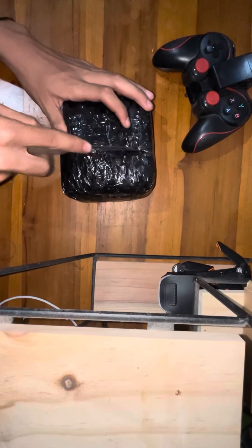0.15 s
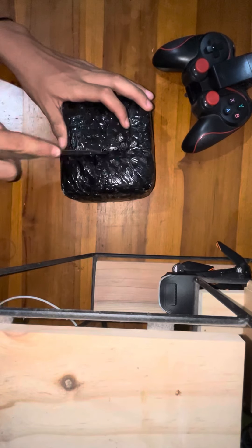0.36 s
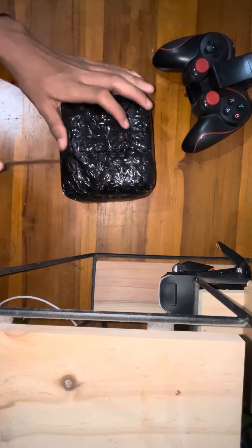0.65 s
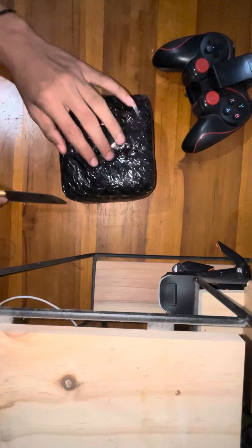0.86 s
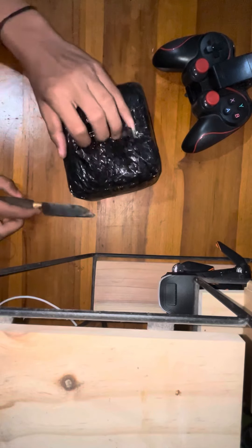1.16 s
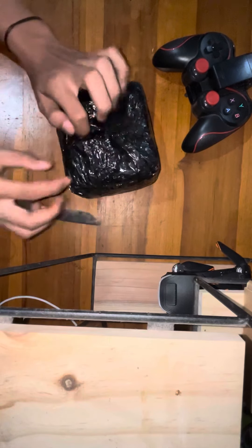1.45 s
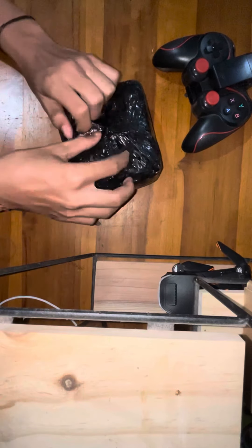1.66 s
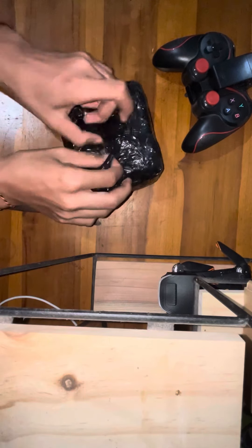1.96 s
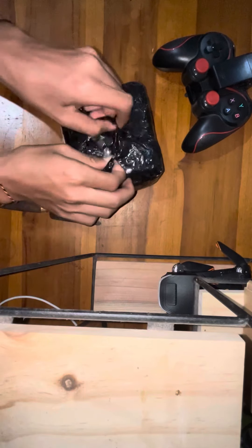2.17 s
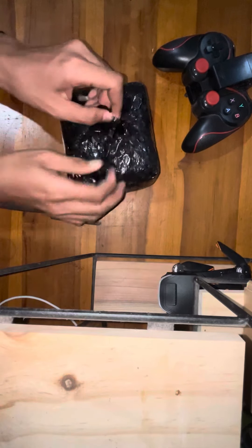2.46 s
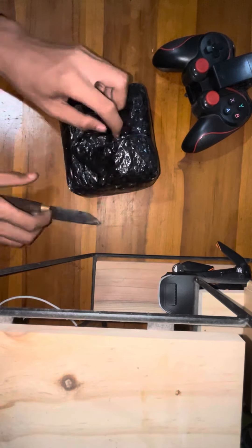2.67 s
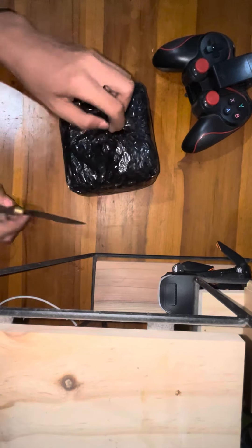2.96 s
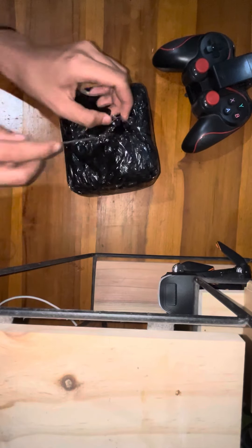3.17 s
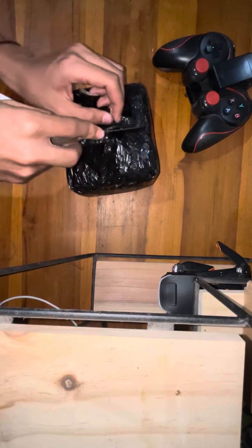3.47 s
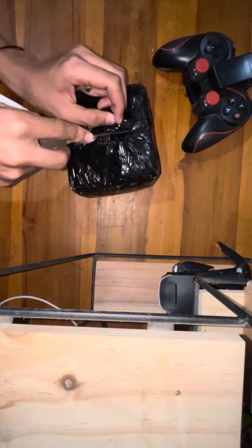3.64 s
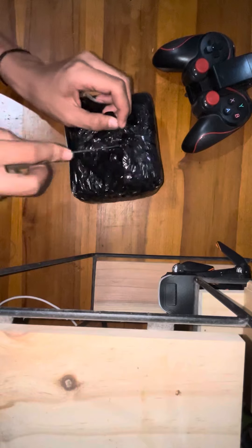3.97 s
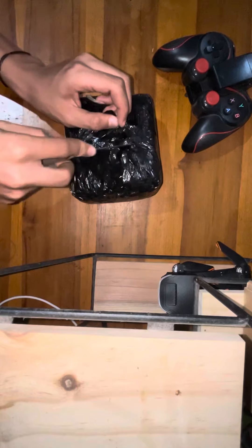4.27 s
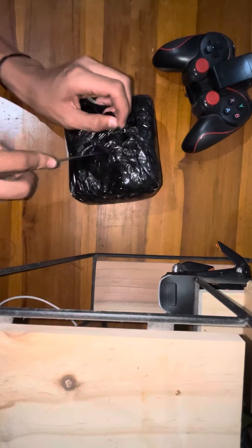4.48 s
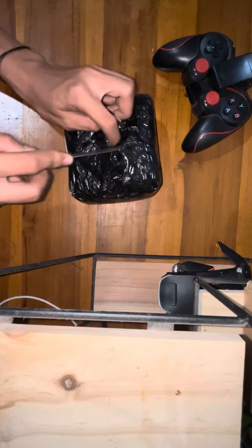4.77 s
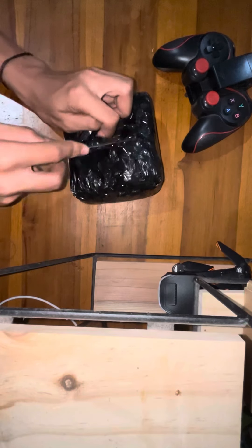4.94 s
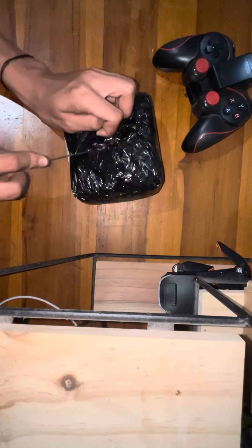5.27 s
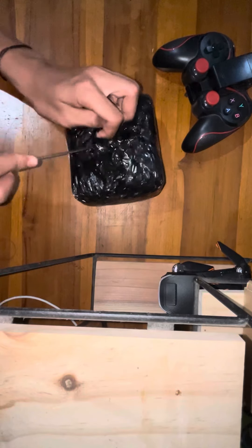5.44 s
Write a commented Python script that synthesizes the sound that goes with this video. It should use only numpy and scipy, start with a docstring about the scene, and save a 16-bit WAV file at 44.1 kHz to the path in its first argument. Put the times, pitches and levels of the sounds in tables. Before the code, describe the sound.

Close to the microphone, the plastic wrap of a small parcel crinkles in uneven bursts as it is slit and pulled. A knife clacks down on the wooden table, fingers tap and tug the film with sharp snaps, and the knife clacks again. A louder run of cracks and a brief blade rasp follow, then more crackling. The parcel scrapes and softly thumps the table in a room with little echo.

```python
"""A wooden table in a room, a phone's two microphone ports above it. The plastic wrap of a small parcel is slit
with a knife and tugged open: the film rustles in dense tiny creases and snaps in louder ones. The parcel
scrapes and shoves the table, whose board knocks and whose frame booms near 64 Hz. The knife clacks on the wood,
fingers tap the parcel and the board, the blade rasps in the slit. The two ports hear the treble with a lag
between them."""
import sys
import numpy as np
from scipy import signal
from scipy.fft import rfft, irfft, next_fast_len
from scipy.io import wavfile
from scipy.ndimage import map_coordinates

SR = 44100
rng = np.random.default_rng(int(sys.argv[2]) if len(sys.argv) > 2 else 0)


def waveform_to_disk(signal):
    """Save audio, clipped to [-1, 1], as 16-bit WAV at the path in sys.argv[1]."""
    frames = np.transpose(np.atleast_2d(signal))
    scaled = np.clip(frames, -1, 1) * 32767
    samples = np.round(scaled).astype(np.int16)
    wavfile.write(sys.argv[1], SR, samples)


N = 247401

# Steady working of the film. Each row: time in seconds, crease level in dB, scrape level in dB.
HANDLING = [(0.05, -73.5, -76), (0.066, -55.5, -60.5), (0.28, -47, -48.5), (0.49, -46.5, -49),
            (0.83, -57, -62), (0.88, -52, -55.5), (1.1, -48, -50.5), (1.4, -50.5, -55.5),
            (1.52, -60, -58.5), (1.75, -45, -49.5), (2.2, -47, -51.5), (2.72, -53.5, -60),
            (3.1, -50.5, -56.5), (3.19, -55, -70.5), (3.39, -65, -71), (3.412, -52, -58.5),
            (3.68, -48.5, -62), (4.115, -65.5, -62), (4.19, -51.5, -59.5), (4.57, -50.5, -48.5),
            (4.64, -56, -58), (4.8, -53.5, -61.5), (5.07, -52, -52.5), (5.35, -53.5, -47.5),
            (5.61, -53.5, -75)]


def amp(db):
    """Gain of a level in dB."""
    return 10 ** (np.asarray(db) / 20)


def unit(x):
    """x at rms 1."""
    return x / np.sqrt(np.mean(x ** 2) + 1e-20)


def along(points, hz):
    """Interpolate (Hz, value) points on a log axis."""
    f, v = np.transpose(points)
    return np.interp(np.log(hz + 1), np.log(f + 1), v)


def curves(rows):
    """One value per sample for each column after the time."""
    s, *cols = np.transpose(rows)
    return [np.interp(np.arange(N) / SR, s, c) for c in cols]


def filtered(x, response):
    """x through a complex response of frequency."""
    m = next_fast_len(N + SR // 2)
    return irfft(rfft(x, m) * response(np.fft.rfftfreq(m, 1 / SR)), m)[..., :N]


def modes(rows):
    """Causal response of broad resonances, given as (centre Hz, width Hz, gain dB)."""
    return lambda f: sum((-1) ** k * amp(db) * 1j * f * width / (hz * hz - f * f + 1j * f * width)
                         for k, (hz, width, db) in enumerate(rows))


def wobble(rate):
    """A smooth random curve, rate knots a second."""
    return map_coordinates(rng.standard_normal(int(N * rate / SR) + 4), [np.arange(N) * rate / SR])


def grains(rate, spread_db, clump_db, t60, smooth):
    """Two noises gated alike by short random bursts, a few much louder, in clumps over a smooth part."""
    starts = (rng.random(N) < rate / SR) * amp(spread_db * np.minimum(rng.exponential(size=N), 4))
    gate = signal.lfilter([1], [1, -amp(-60 / (t60 * SR))], starts)
    return unit((unit(gate) + smooth) * amp(clump_db * wobble(30)) * rng.standard_normal((2, N)))


def swells(peaks_s, levels_db, rise_db_per_s, fade_db_per_s):
    """Gain of bursts that swell to their peak and fade away, summed as power."""
    late = np.arange(N) / SR - np.reshape(peaks_s, (-1, 1))
    drop_db = np.where(late < 0, np.reshape(rise_db_per_s, (-1, 1)), -fade_db_per_s) * late
    return np.sqrt(np.sum(amp(np.reshape(levels_db, (-1, 1)) + drop_db) ** 2, axis=0))


def hand_effort():
    """Gains of creases and scrape: steady working plus tugs and cuts."""
    # Each row: peak in seconds, crease in dB, scrape in dB, seconds to swell 20 dB (sign ignored).
    tugs = [(0.536, -45, -41.5, 0.2), (1.19, -55, -60, 0.1), (1.294, -70, -43.5, 0.12),
            (1.596, -40, -44.5, 0.05), (1.967, -50, -41, 0), (2.069, -43.5, -53, 0),
            (2.477, -43, -43.5, -0.31), (2.794, -56, -44.5, 0.07), (3.713, -53, -45.5, 0.3),
            (3.817, -36.5, -36.5, 0.0843), (4.252, -50, -39, 0.0145), (4.313, -39.5, -39, 0.08),
            (4.521, -46, -45, 0.24), (4.85, -45, -46, 0.07), (5.256, -40, -40.5, 0.17),
            (5.479, -47, -45, 0.07)]
    s, crease_db, scrape_db, swell_s = np.transpose(tugs)
    tugging = [swells(s, db, 20 / np.abs(swell_s), fade_db_per_s=163) for db in (crease_db, scrape_db)]
    return np.hypot(amp(curves(HANDLING)), tugging)


def rustle():
    """Large and small creases flip all over the film; the parcel scrapes the wood with a duller grain."""
    # Spectra of film and scrape. Each row: frequency in Hz, relative level in dB.
    film_spectrum = [(400, -30), (1200, -8), (2500, -2), (5000, -1), (12500, 0), (16000, -7)]
    scrape_spectrum = [(200, -4), (450, -2.5), (950, -0.5), (1450, 3.5), (1900, 0.5), (2500, 4), (4800, 0),
                       (9000, -51)]
    creasing, scraping = hand_effort()
    large = grains(rate=460, spread_db=4.0, clump_db=2.3, t60=0.02, smooth=0.85)
    small = grains(rate=450, spread_db=5.5, clump_db=2.6, t60=0.006, smooth=0.9)
    share = lambda hz: 1 / (1 + (hz / 7000) ** 4)  # small creases take over in the treble
    creases = filtered(large, lambda hz: np.sqrt(share(hz)))
    creases += filtered(small, lambda hz: np.sqrt(1 - share(hz)))
    creases = unit(filtered(creases, lambda hz: amp(along(film_spectrum, hz))))
    scrape = grains(rate=430, spread_db=3.0, clump_db=2.2, t60=0.03, smooth=0.65)
    scrape = unit(filtered(scrape, lambda hz: amp(along(scrape_spectrum, hz))))
    return creasing * creases + scraping * scrape


def sharp_cracks():
    """Film folds snap, and the knife clacks on the wood at 1.28 and 2.78 s; each knocks the board."""
    # Each row: start in seconds, levels of crack, bright edge and knock in dB, crack pitch in Hz.
    strikes = [(0.061, -42, -38.5, -55, 2770), (0.268, -40, -38, -59, 2500), (0.348, -38, -38, -51, 3440),
               (0.399, -28.5, -38, -40, 1950), (0.515, -24.5, -29.5, -35, 1450),
               (0.529, -22.5, -25, -32, 1920), (0.675, -30.5, -53, -56, 1140),
               (0.687, -34.5, -39.5, -48, 1550), (0.735, -34.5, -33.5, -46, 2420),
               (0.8602, -39, -39, -52.5, 2230), (1.1843, -35.5, -41, -47, 1300),
               (1.283, -15, -41, -34.5, 1590), (1.8558, -31, -32, -48.5, 1480),
               (1.968, -29, -31, -30, 1490), (2.0365, -29, -44, -36.5, 1090),
               (2.1526, -42, -26.5, -66.5, 2650), (2.1631, -23, -32, -64, 2280),
               (2.2304, -30, -36.5, -48, 1320), (2.2989, -26.5, -31.5, -44.5, 1300),
               (2.3086, -29, -35, -67, 1690), (2.3121, -13, -23.5, -41.5, 1580),
               (2.461, -21.5, -32.5, -32.5, 1630), (2.601, -25, -32, -39.5, 1290),
               (2.7805, -25, -46, -33, 2670), (3.088, -42, -51.5, -48, 1500),
               (3.1347, -53, -33.5, -58.5, 2900), (3.368, -45, -55, -79, 1450),
               (3.407, -39, -49, -70, 1350), (3.6513, -27.5, -35, -48, 1460),
               (3.7044, -13, -22.5, -24.5, 2420), (3.7143, -19, -43, -38, 1390),
               (3.754, -15, -17.5, -27, 2210), (3.7607, -18.5, -24, -33.5, 1390),
               (3.807, -36, -19, -45, 2470), (3.8141, -26, -26, -45, 2820),
               (3.838, -36, -32.5, -43.5, 2900), (4.2409, -26.5, -29.5, -37.5, 1450),
               (4.255, -14.5, -36, -28, 1570), (4.2922, -24, -32, -43, 2600),
               (4.316, -17, -37, -29.5, 1570), (4.5098, -28.5, -37.5, -44.5, 2120),
               (4.533, -34, -34, -45, 3820), (5.0909, -34.5, -35.5, -48.5, 3250),
               (5.185, -31.5, -35, -48, 1490), (5.206, -34, -58, -48, 1210), (5.257, -32, -32, -35, 1430),
               (5.465, -29, -42, -55, 1180), (5.489, -35, -27.5, -49.5, 890)]
    # The board's knock resonances. Each row: centre in Hz, width in Hz, gain in dB.
    knock_modes = [(309, 190, 28), (429, 294, 25.5), (662, 248, 25.5), (852, 650, 21.5)]
    parts, t = np.zeros((3, 2, N + SR)), np.arange(SR // 8) / SR
    edge = amp(-60 * t / 0.0016) + 0.11 * amp(-60 * t / 0.03)
    crack = 0.86 * amp(-60 * t / 0.0058) + 0.055 * amp(-60 * t / 0.06)
    knock = 0.16 * amp(-60 * t / 0.15)
    shapes = np.array([edge, crack, knock])[:, None]
    grid_hz = np.fft.rfftfreq(len(t), 1 / SR)
    for s, crack_db, edge_db, knock_db, crack_hz in strikes:
        ragged = amp(5 * rng.standard_normal(len(t) // 60 + 1)).repeat(60)[:len(t)]
        bursts = shapes * rng.standard_normal((3, 2, len(t)))
        bursts *= (np.linalg.norm(shapes, axis=2) / np.linalg.norm(bursts, axis=2))[..., None]
        bursts[1] += 0.08 * amp(-60 * t / 0.035) * ragged * rng.standard_normal((2, len(t)))
        bursts[1:, 0, 0] += [3.2, 5]  # crack and knock start with one clean push
        overtone_hz = 1.87 * crack_hz
        body = modes([(crack_hz, 0.45 * crack_hz, 11.5), (overtone_hz, 0.45 * overtone_hz, 8)])
        bursts[1] = irfft(rfft(bursts[1]) * body(grid_hz), len(t))
        bursts *= amp([edge_db, crack_db, knock_db])[:, None, None]
        parts[:, :, round(s * SR):][:, :, :len(t)] += bursts
    edges, cracks, knocks = parts[:, :, :N]
    bright = filtered(edges, lambda hz: 5.24 * (1j * hz / (4200 + 1j * hz)) ** 2)
    struck = bright + cracks + filtered(knocks, modes(knock_modes))
    # low pitches arrive later: a delay of about one cycle plus 0.8 ms
    return filtered(struck, lambda hz: np.exp(-2j * np.pi * (np.log(hz + 20) + .0008 * hz)))


def table_shoves():
    """Shoves thump frame and top board and leave the board rattling; scraping keeps both stirring."""
    # Each row: time in seconds, frame boom in dB, top board in dB.
    shoves = [(0.541, -36.5, -49.5), (0.644, -45.5, -60), (0.901, -47, -61), (1.013, -44, -39),
              (1.179, -45, -42.5), (1.244, -34, -49), (1.29, -30.5, -37), (1.353, -44, -38.5),
              (1.788, -50, -53), (1.974, -35.5, -48), (2.134, -45.5, -58), (2.474, -41.5, -49.5),
              (2.77, -38, -34), (2.835, -41, -40.5), (2.904, -43, -58), (3.705, -48, -49),
              (3.762, -37, -46.5), (4.317, -45, -48.5), (4.853, -40, -58), (5.486, -49, -56)]
    # Resonances of frame and top board. Each row: centre in Hz, width in Hz, gain in dB.
    frame_modes = [(63.7, 21, 0)]
    top_modes = [(106.8, 31, 3.5), (194.6, 77, -5.5), (283, 217, -11.5)]
    s, boom_db, board_db = np.transpose(shoves)
    scraping = amp(curves(HANDLING)[1])
    sway = lambda hz: modes(frame_modes)(hz) ** 2
    flex = lambda hz: modes(top_modes)(hz) ** 2
    pushes, impulse = np.zeros((2, N)), np.arange(N) == 0
    pushes[:, np.round(s * SR).astype(int)] = amp([boom_db, board_db - 3.5]) * rng.choice([-1, 1], len(s))
    thumps = sum(filtered(push, body) / np.abs(filtered(impulse, body)).max()
                 for push, body in zip(pushes, (sway, flex)))
    stirring = np.hypot(amp(-7) * scraping, amp(-71))  # the building's faint tremor remains at rest
    rumble = stirring * unit(filtered(rng.standard_normal((2, N)), sway))
    chatter = grains(rate=80, spread_db=2, clump_db=1.5, t60=.06, smooth=.45)
    jolts = swells(s + 0.0083, board_db, rise_db_per_s=700, fade_db_per_s=170)
    rattle = np.hypot(jolts, amp(-12) * scraping) * unit(filtered(chatter, modes(top_modes)))
    return thumps * [[1], [0]] + rumble + rattle


def knife_touches():
    """Every touch on the table rings handle and blade, each mode at a new strength and phase."""
    # Each row: start in seconds, handle level in dB, blade level in dB.
    touches = [(1.008, -52, -41), (1.172, -48.5, -44), (1.283, -31, -34), (1.287, -40, -36.5),
               (1.29, -32, -42), (1.297, -32.5, -49), (1.506, -46.5, -50.5), (2.756, -40, -80),
               (2.765, -35, -69), (2.779, -40.5, -35.5), (2.795, -30.5, -66)]
    # Modes of handle and blade. Each row: pitch in Hz, level in dB, seconds to fade 60 dB.
    handle_modes = [(278, -12.5, 0.065), (471, -13.5, 0.31), (612, -7.5, 0.18), (713, -1, 0.049),
                    (904, -2.5, 0.08), (1085, -3.5, 0.059), (1333, -3, 0.066), (1632, -4, 0.054)]
    blade_modes = [(2355, -1, .06), (2620, -3, .06), (2900, -1, .05), (3400, -3, .07), (4350, -2, .05)]
    out, t = np.zeros((2, N + SR)), np.arange(SR // 5) / SR
    for s, handle_db, blade_db in touches:
        for ringing, db in ((handle_modes, handle_db), (blade_modes, blade_db)):
            for hz, mode_db, t60 in ringing:
                phase = 2 * np.pi * (hz * t + rng.random((2, 1)))
                blur = np.cumsum(rng.normal(0, .055, len(t)))  # a rattling grip blurs the pitch
                decay = amp(db + mode_db + rng.normal(0, 4.1) - 60 * t / t60)
                out[:, round(s * SR):][:, :len(t)] += decay * np.sin(phase + blur)
    return out[:, :N]


def finger_taps():
    """Each tap is one soft note, of the hollow parcel or of the table's board."""
    # Each row: start in seconds, level in dB, pitch in Hz.
    taps = [(1.011, -33.5, 640), (1.51, -39.5, 196), (1.56, -39.5, 260), (1.636, -39.5, 199),
            (2.492, -36, 420)]
    t60, rise_s = 0.055, 0.003
    out, t = np.zeros(N + SR), np.arange(SR // 4) / SR
    for s, db, hz in taps:
        envelope = amp(db - 60 * t / t60) * (1 - np.exp(-t / rise_s))
        out[round(s * SR):][:len(t)] += envelope * np.sin(2 * np.pi * hz * t)
    return out[:N] * [[1], [0]]


def blade_rasp():
    """Drawn out of the cut, the blade rubs along the slit and sounds the hollow under it."""
    # Each row: time in seconds, level in dB.
    stroke = [(3.84, -87), (3.89, -52.5), (4.05, -56), (4.08, -74)]
    rubbing = grains(rate=500, spread_db=2, clump_db=1.2, t60=0.02, smooth=1.5)
    return amp(curves(stroke)[0]) * unit(filtered(rubbing, lambda hz: modes([(1100, 900, 0)])(hz) ** 2))


def room_tail(x):
    """The room's short answer, dying fastest in the treble."""
    # Each row: frequency in Hz, seconds to fade 60 dB.
    decay_times = [(200, 0.38), (1500, 0.24), (5000, 0.19), (14000, 0.028)]
    hz, t, noise = signal.stft(rng.standard_normal((2, SR // 3)), SR, nperseg=256)
    tail = signal.istft(noise * amp(-60 * t / along(decay_times, hz)[:, None]), SR, nperseg=256)[1]
    delayed = np.pad(x, ((0, 0), (200, 0)))
    return signal.fftconvolve(delayed, tail / np.linalg.norm(tail[0]), axes=1)[:, :N]


def scene():
    """Both ports share row 0 of each source; row 1 is scattered and reaches them in opposite sense."""
    # Each row: frequency in Hz, likeness of left and right (1 is identical).
    likeness = [(60, .93), (300, .86), (800, .55), (1600, .7), (2600, .5), (4500, .4), (6000, .85),
                (15000, .9)]
    hits = sharp_cracks() + knife_touches() + finger_taps()
    pair = hits + amp(-15) * room_tail(hits) + rustle() + blade_rasp() + table_shoves()
    turn = lambda hz: np.arccos(np.clip(along(likeness, hz), -1, 1)) / 2
    shared, scattered = filtered(pair, lambda hz: np.array([np.cos(turn(hz)), np.sin(turn(hz))]))
    return np.array([shared + scattered, shared - scattered])


def record(dry):
    """The phone's ports differ in phase and level; deep bass rolls off and the top treble is cut."""
    # Each row: frequency in Hz, phase lead of the left port in radians.
    lead = [(0, 0), (300, -.4), (900, -1.3), (1550, 0), (2600, 2.4), (4400, 3.1), (5800, 3.14),
            (14800, 15.7), (17000, 17)]
    # Each row: frequency in Hz, left minus right in dB.
    balance = [(60, 0.5), (200, -2.5), (2500, -2), (5000, 0)]
    half, top_hz = np.array([[.5], [-.5]]), 16700
    phase = lambda hz: np.exp(1j * half * np.interp(hz, *np.transpose(lead)))
    level = lambda hz: amp(half * along(balance, hz))
    rolloff = lambda hz: amp(along([(30, -15), (48, -0.5), (15700, 0.5), (16000, -46), (16600, -30)], hz))
    return filtered(dry, lambda hz: phase(hz) * level(hz) * rolloff(hz) * (hz < top_hz))


dry = scene()
out = record(dry)
waveform_to_disk(out)
```